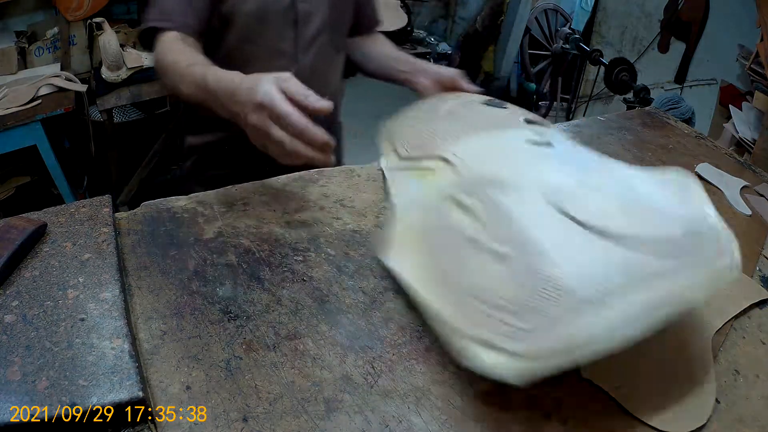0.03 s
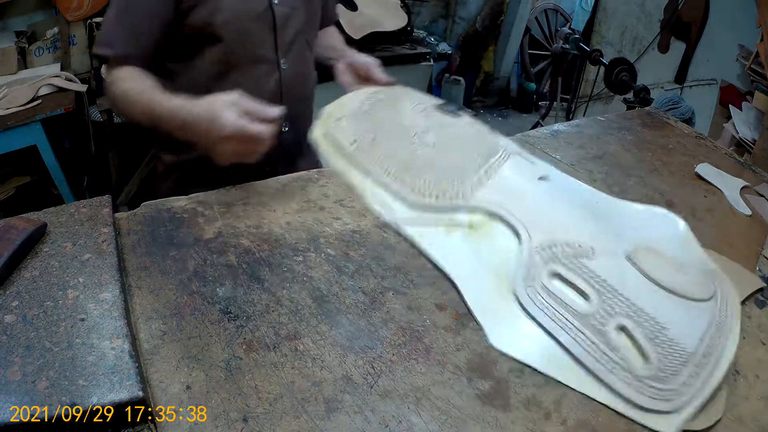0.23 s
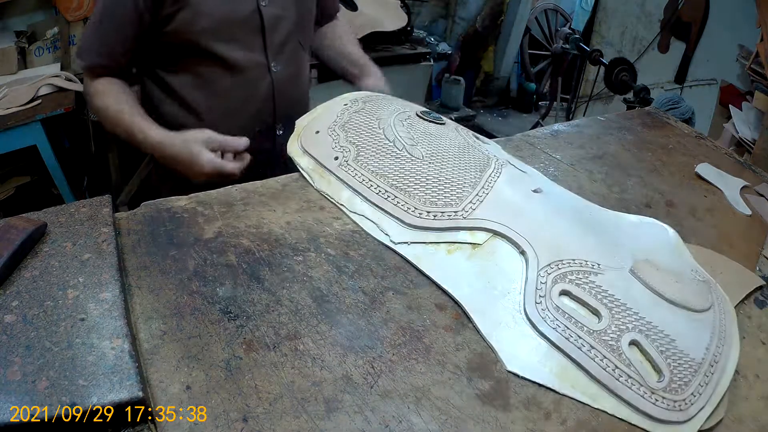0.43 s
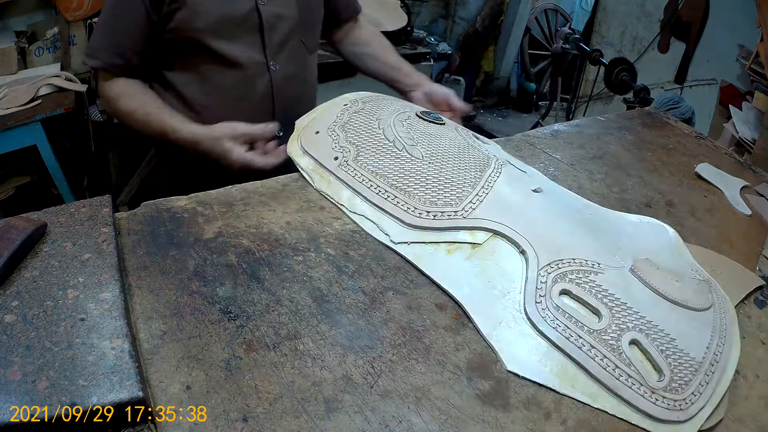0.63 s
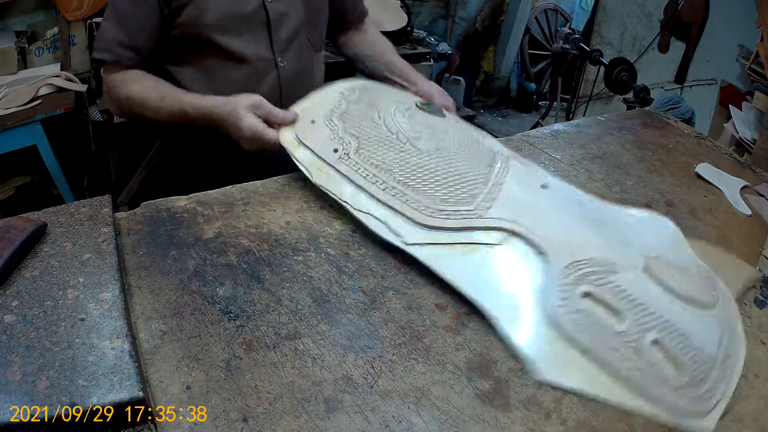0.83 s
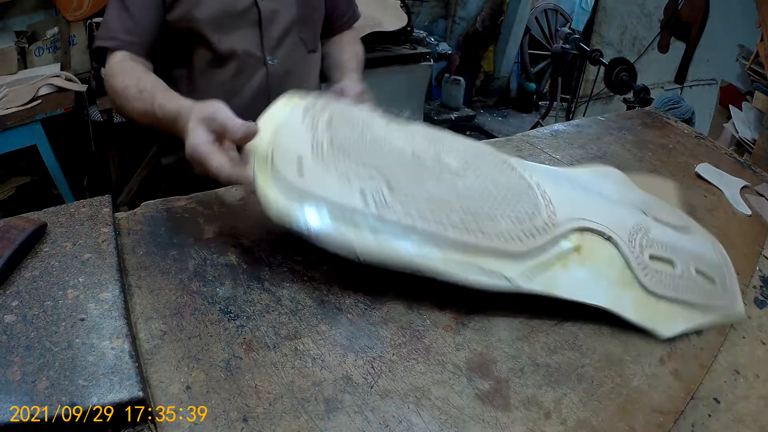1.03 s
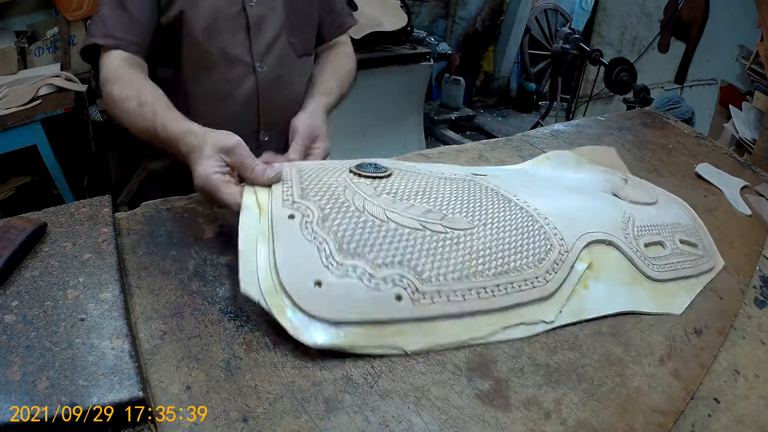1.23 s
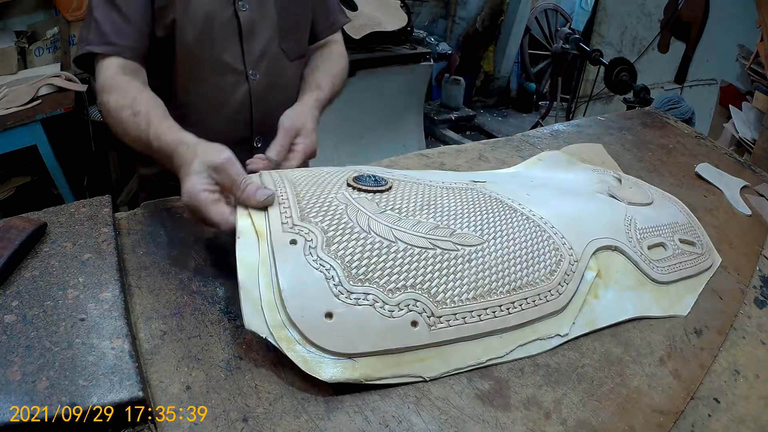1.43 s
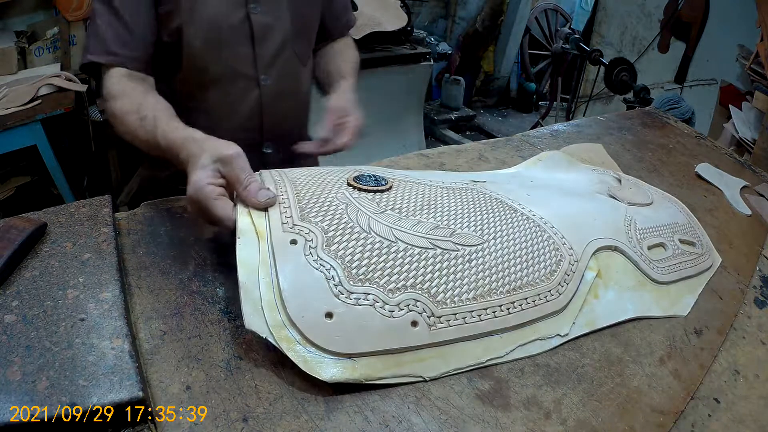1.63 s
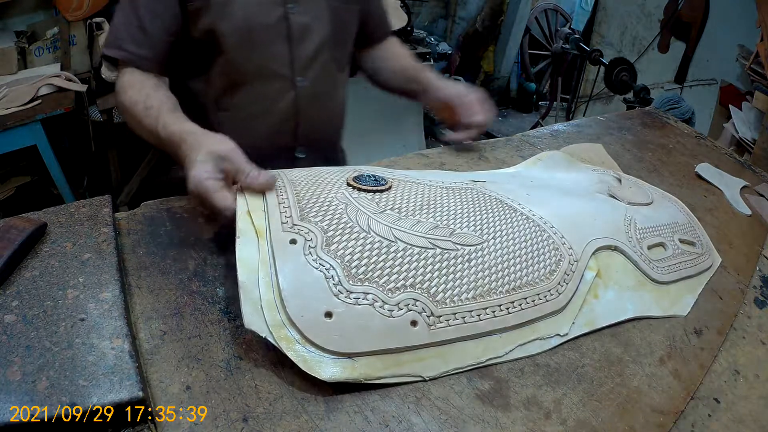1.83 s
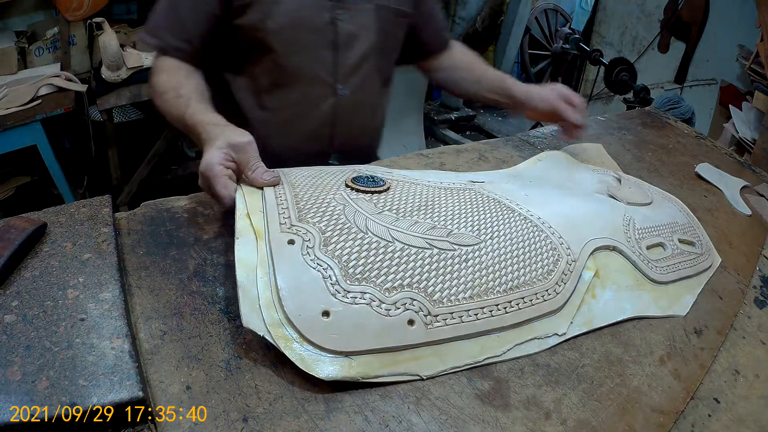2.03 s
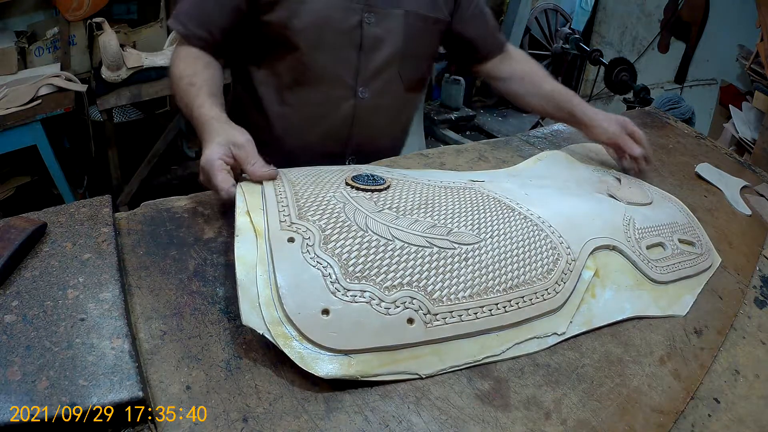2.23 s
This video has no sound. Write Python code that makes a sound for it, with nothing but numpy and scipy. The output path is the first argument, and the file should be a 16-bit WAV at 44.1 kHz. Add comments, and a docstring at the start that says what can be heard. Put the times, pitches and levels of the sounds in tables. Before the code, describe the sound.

A loud slap of leather landing on a wooden bench, followed by sliding and soft rubbing.

```python
"""Leather slapped on a workbench

A heavy piece of leather swings down, slaps a wooden bench in a few quick contacts and flops to rest.
Each contact pops the trapped air and makes the wood ring. The leather is dragged over the wood and
smoothed by hand, rubbing in many tiny slips; a fingertip ticks on it. A small, quiet workshop
echoes, and the slap overloads the microphone."""
import sys
import numpy as np
from scipy import signal
from scipy.fft import rfft, irfft, next_fast_len
from scipy.io import wavfile
from scipy.ndimage import map_coordinates

SR = 44100
rng = np.random.default_rng(int(sys.argv[2]) if len(sys.argv) > 2 else 0)


def inscribe(sig):
    """Save sig as 16-bit PCM at rate SR to the path in sys.argv[1].

    A 1-D sig is mono; a 2-D sig holds one channel per row.
    Samples are clipped to [-1, 1] before scaling.
    """
    pcm = np.round(np.clip(np.atleast_2d(sig).T, -1, 1) * 32767)
    wavfile.write(sys.argv[1], SR, pcm.astype(np.int16))


N = 101429

# the tone of hands rubbing leather: pitch_hz, level_db
HAND_TONE = [(100, -34), (450, -11), (800, -3), (1150, 1), (1550, -10), (2300, -11.5), (3000, -24),
             (4000, -23.5), (5200, -32.5), (8000, -27.5), (9500, -22)]


def slaps():
    """The leather lands edge first, then flat; each contact pops trapped air, cracks and thumps."""
    # the contacts: start_s, level_db, air_pitch_hz, crack_db, thump_db
    contacts = [(0.2292, -8, 1340, -9, -10.5), (0.2317, -6.5, 926, -6, -1), (0.2384, 0.5, 1767, -5, -25),
                (0.2448, 3, 906, 2, -2)]
    # the tone of the crack: pitch_hz, level_db
    crack_tone = [(60, -12), (300, 6.5), (600, -5), (1250, 7), (1900, -0.5), (2700, -6), (4000, -14),
                  (5200, -24), (7000, -16.5), (8100, -14), (8900, -27), (15000, -46)]
    out, t = np.zeros(N), np.arange(SR) / SR
    for start_s, level_db, air_pitch_hz, crack_db, thump_db in contacts:
        pop = ring(t, air_pitch_hz, fade_s=0.02)
        crack = noise(crack_tone, SR) * burst(t, rise_s=0.00028, fade_s=0.019)
        thump = 0.49 * ring(t, pitch_hz=337, fade_s=0.026) + bench(t)
        add(out, start_s, amp(level_db) * (pop + amp(crack_db) * crack + amp(thump_db) * thump))
    return out


def bench(t):
    """The bench top rings at many pitches at once, a little differently for each blow."""
    # the wood's natural notes: pitch_hz, level_db, fade_s
    notes = [(44.4, -31, .12), (82, -43, 0.49), (112.8, -17, 0.29), (179, -21, 0.17), (322, -46, 0.064),
             (397, -19.5, 0.11), (561, -20, 0.22), (663, -15, 0.1), (887, -29, 0.27), (927, -22, 0.23),
             (1010, -29, 0.48), (1143, -24.5, 0.14), (1236, -15, 0.078), (1605, -24, .12)]
    return sum(amp(level_db + rng.normal(0, 1)) * ring(t, pitch_hz, fade_s)
               for pitch_hz, level_db, fade_s in notes)


def pats(width_octaves=0.76):
    """A flap or finger lands softly: a short hollow note, a puff near that pitch, a nudge to the bench."""
    # the soft touches: start_s, level_db, pitch_hz, rise_s, fade_s, bench_db
    touches = [(0.0382, -30, 1150, 0.002, 0.036, -33), (0.1125, -23.5, 580, 0.00024, 0.014, -0.5),
               (.166, -30, 1050, .0007, 0.016, -30), (0.329, -19.5, 756, 0.00025, 0.0047, 6),
               (0.338, -25, 885, 0.00057, 0.017, -15), (.3648, -17.5, 823, 0.00031, 0.024, -10),
               (.3695, -15, 672, 0.0012, 0.026, -6), (.3905, -19, 840, 0.0014, 0.025, 5),
               (.4075, -14, 670, 0.00044, 0.0083, -24), (.416, -32, 590, 0.0022, .035, -17),
               (.428, -31, 576, 0.003, 0.028, -16), (1.117, -28.5, 1280, 0.0009, 0.049, -13),
               (1.182, -23, 910, 0.0013, 0.011, -14), (1.186, -30, 460, 0.0016, 0.028, -11),
               (1.263, -30, 610, 0.00074, 0.021, -19), (1.2677, -21, 342, 0.00075, 0.03, -7),
               (1.272, -28.5, 692, 0.0015, 0.039, -17), (1.281, -31, 465, 0.0016, 0.054, -3),
               (1.8984, -29, 1280, .001, 0.012, -30)]
    out, t = np.zeros(N), np.arange(SR // 2) / SR
    for start_s, level_db, pitch_hz, rise_s, fade_s, bench_db in touches:
        def near_pitch(hz):
            octaves_away = np.log2((hz + 1) / pitch_hz)
            return 1 / (1 + (octaves_away / width_octaves) ** 2) ** 2
        puff = unit(filtered(rng.standard_normal(len(t)), near_pitch))
        note = np.sin(2 * np.pi * pitch_hz * t)
        shape = burst(t, rise_s, fade_s)
        pop = shape / shape.max() * (note + amp(-2) * puff)
        add(out, start_s, amp(level_db - 1) * (pop + amp(bench_db) * bench(t)))
    return out


def scuff():
    """The leather scuffs the bench as it settles."""
    # the scuff's loudness: time_s, level_db
    loudness = [(.228, -47), (.25, -25), (.275, -22), (.31, -31), (.355, -30.5), (.382, -32.5),
                (.41, -26.5), (.433, -33), (.447, -48), (.475, -61), (.55, -51), (.6, -77)]
    # its tone: pitch_hz, level_db
    tone = [(40, -3), (110, 2), (150, -5), (280, 3), (355, 4.5), (470, 1), (600, 2), (900, -12),
            (1150, 1.5), (1500, -9), (2200, -8.5), (2800, -20), (4000, -27.5), (5200, -34), (8200, -34),
            (9500, -21.5)]
    return levels(loudness)[0] * friction(tone, spread_db=0.5, flutter_db=2.3)


def drag():
    """The leather's rough side rasps over the wood, fibres fizzing; it dulls as the sheet lies down."""
    # how the three parts swell and fade: time_s, body_db, rasp_db, fizz_db
    loudness = [(.92, -61, -55.5, -66), (1.0, -40.5, -41.5, -49), (1.055, -37.5, -38.5, -41),
                (1.125, -39.5, -35, -41), (1.17, -36, -35.5, -45.5), (1.23, -37.5, -39, -43.5),
                (1.275, -30, -40.5, -49), (1.305, -37.5, -44, -53), (1.335, -51, -56, -61)]
    # the tones of the low wooden body, middle rasp and high fizz: pitch_hz, level_db
    body_tone = [(60, -4), (200, -4), (350, -8.5), (460, 2), (560, -10), (720, -2), (920, 2), (1100, 2.5),
                 (1350, -5), (2000, -26), (4000, -34)]
    rasp_tone = [(500, -18), (1000, -7.5), (1300, -6.5), (1550, -3), (1750, 2), (1980, -3), (2300, -1.5),
                 (3000, -10.5), (3900, -16), (5000, -35), (8000, -35)]
    fizz_tone = [(1500, -22), (3000, -11), (4000, 1.5), (5200, -6.5), (6500, -4), (8200, -3), (9000, 1),
                 (14000, 5), (16000, -15)]
    body_gain, rasp_gain, fizz_gain = levels(loudness)
    body = body_gain * friction(body_tone, spread_db=2.5, flutter_db=2.4)
    rasp = rasp_gain * friction(rasp_tone, spread_db=2.5, flutter_db=0.2)
    fizz = fizz_gain * friction(fizz_tone, spread_db=3, flutter_db=1.1)
    return amp(-1) * body + rasp + amp(4) * fizz


def brush():
    """The leather brushes out of the hands as it swings down."""
    # the brushing's loudness: time_s, level_db
    loudness = [(0, -33), (.04, -33.5), (.075, -38.5), (.097, -37.5), (.108, -40.5), (.16, -38), (.19, -34),
                (.225, -34), (.3, -64)]
    return levels(loudness)[0] * friction(HAND_TONE, spread_db=1, flutter_db=0.5)


def smoothing():
    """The hands take hold, then smooth and stroke the sheet."""
    # the strokes' loudness: time_s, level_db
    loudness = [(.72, -54), (.84, -47.5), (.93, -50.5), (1.3, -50), (1.36, -43), (1.42, -46.5),
                (1.465, -42), (1.55, -54), (1.68, -51), (1.78, -80), (1.94, -65), (1.99, -44), (2.015, -53),
                (2.037, -39.5), (2.09, -66), (2.21, -46.5), (2.3, -82)]
    return levels(loudness)[0] * friction(HAND_TONE, spread_db=3.5, flutter_db=2)


def skid():
    """The leather slides a little after landing, and again under the smoothing hand."""
    # the skid's loudness: time_s, level_db
    loudness = [(.44, -55), (.472, -46), (.487, -38), (.51, -41), (.54, -53), (.62, -55), (1.34, -63),
                (1.42, -46.5), (1.47, -40.5), (1.52, -47.5), (1.6, -72)]
    # its tone: pitch_hz, level_db
    tone = [(200, -8), (700, 10), (1400, 3), (2200, 2), (3000, -13), (4500, -18), (9000, -21)]
    return levels(loudness)[0] * friction(tone, spread_db=2.5, flutter_db=1.5)


def whumps(pitch_hz=52, rise_s=0.021):
    """The broad sheet pushes out a slow, deep puff of air as it comes down."""
    # the puffs of air: start_s, level_db
    puffs = [(.112, -40.5), (.378, -38), (.53, -42.5), (1.277, -40)]
    out, t = np.zeros(N), np.arange(SR // 4) / SR
    swell = t / rise_s * np.exp(1 - t / rise_s)
    for start_s, level_db in puffs:
        add(out, start_s, amp(level_db) * swell * np.sin(2 * np.pi * pitch_hz * t))
    return out


def room(sound, echo_count=24, low_cut_hz=353):
    """Near walls and clutter add quick echoes, then a short tail, both with little bass."""
    # how long the room rings: pitch_hz, fade_s
    fade_times = [(80, 0.16), (250, 0.66), (600, 0.33), (1500, 0.45), (4000, 0.41), (10000, 0.45)]
    hz, t, bands = signal.stft(rng.standard_normal(SR), SR, nperseg=256)
    tail = signal.istft(bands * fade(t, along(fade_times, hz)[:, None]), SR, nperseg=256)[1]
    late = np.pad(tail, (256, 0))[:len(tail)] / np.linalg.norm(tail)
    delays_s = 0.003 + 0.025 * rng.random(echo_count)
    early = np.bincount((delays_s * SR).astype(int), rng.standard_normal(echo_count), len(tail))
    answer = amp(-11.5) * late + amp(-14) * early / np.linalg.norm(early)
    echoes = signal.fftconvolve(sound, answer)[:N]
    return sound + filtered(echoes, lambda hz: hz / np.hypot(hz, low_cut_hz))


def hush():
    """The workshop's steady, low background noise."""
    # the tone of the hush: pitch_hz, level_db
    tone = [(20, 0.5), (45, -0.5), (80, 0), (115, 4), (160, -2.5), (240, 0), (340, -6), (520, -5),
            (800, -8), (1100, -6.5), (1600, -13), (2200, -18), (3400, -20.5), (6000, -26.5), (8300, -27.5),
            (15000, -26)]
    return amp(-46.5) * noise(tone, N)


def friction(tone, spread_db, flutter_db, slips_per_s=2500, clumps_per_s=130):
    """Rubbing is tiny slips plus noise; spread varies the slips' size, flutter bunches it into clumps."""
    slips = (rng.random(N) < slips_per_s / SR) * rng.choice([-1, 1], N)
    sizes = amp(spread_db * rng.standard_normal(N))
    clumps = map_coordinates(rng.standard_normal(N), [np.arange(N) * clumps_per_s / SR])
    rubbing = unit(slips * sizes) + 1.08 * rng.standard_normal(N)
    return coloured(rubbing * amp(flutter_db * clumps), tone)


def amp(db):
    """Turn decibels into a gain to multiply by."""
    return 10 ** (np.asarray(db) / 20)


def unit(sound):
    """Scale a sound to an average (rms) level of 1."""
    return sound / np.sqrt(np.mean(sound ** 2) + 1e-20)


def along(points, hz):
    """Read between (pitch_hz, value) points, spacing pitches by octaves."""
    pitches, values = np.transpose(points)
    return np.interp(np.log(hz + 1), np.log(pitches + 1), values)


def levels(rows):
    """One gain curve for each decibel column, silent outside the listed times."""
    times, *columns = np.transpose(rows)
    return [amp(np.interp(np.arange(N) / SR, times, db, -120, -120)) for db in columns]


def filtered(sound, gain_at):
    """Turn each pitch up or down by gain_at(hz)."""
    size = next_fast_len(len(sound) + 8192)
    gains = gain_at(np.fft.rfftfreq(size, 1 / SR))
    return irfft(rfft(sound, size) * gains, size)[:len(sound)]


def coloured(sound, tone):
    """Give a sound a (pitch_hz, level_db) tone, at an average level of 1."""
    return unit(filtered(sound, lambda hz: amp(along(tone, hz))))


def noise(tone, samples):
    """Steady noise with the given tone."""
    return coloured(rng.standard_normal(samples), tone)


def fade(t, fade_s):
    """Die away by 60 dB every fade_s seconds."""
    return np.exp(-np.log(1000) * t / fade_s)


def burst(t, rise_s, fade_s):
    """Rise quickly, then die away."""
    return (1 - np.exp(-t / rise_s)) * fade(t, fade_s)


def ring(t, pitch_hz, fade_s):
    """A pure note that dies away."""
    return np.sin(2 * np.pi * pitch_hz * t) * fade(t, fade_s)


def add(track, start_s, sound):
    """Mix a sound into the track at start_s."""
    first = max(round(start_s * SR), 0)
    track[first:first + len(sound)] += sound[:len(track[first:])]


def scene():
    """Leather and bench in the workshop, over its steady hush."""
    background = hush()
    hits = room(slaps()) + room(pats())
    rubbing = room(scuff() + brush() + smoothing() + skid() + drag())
    return (hits + amp(-1) * rubbing + whumps() + background)[None]


def record(dry, ceiling=0.65, hardness=7, top_hz=15750):
    """The microphone squashes the slap, dulls the treble and hisses; nothing above top_hz is kept."""
    # the microphone's treble loss: pitch_hz, level_db
    mic_tone = [(8300, 0), (9000, -11), (16000, -16)]
    squashed = dry[0] / (1 + np.abs(dry[0] / ceiling) ** hardness) ** (1 / hardness)
    dulled = filtered(squashed, lambda hz: amp(along(mic_tone, hz)))
    hiss = amp(-55) * rng.standard_normal(N)
    return filtered(dulled + hiss, lambda hz: hz < top_hz)[None]


dry = scene()
out = record(dry)
inscribe(out)
```